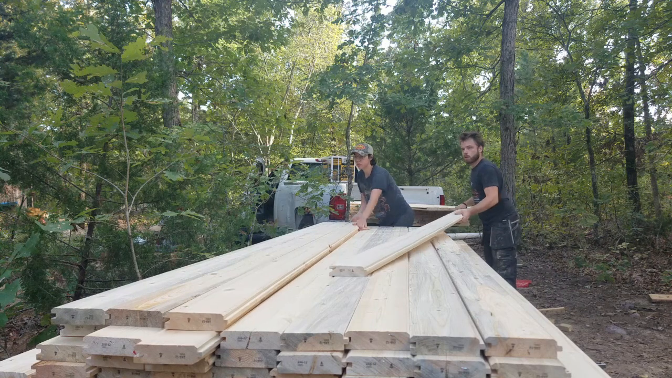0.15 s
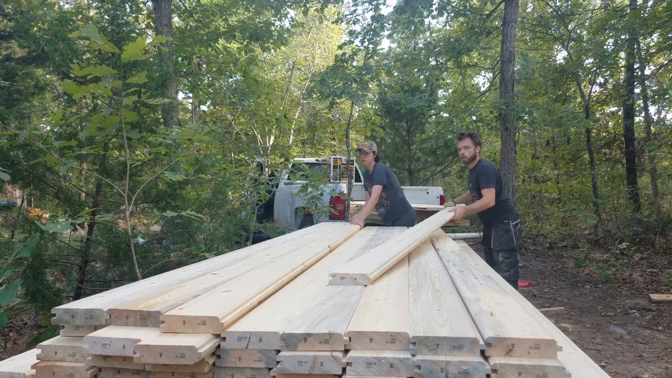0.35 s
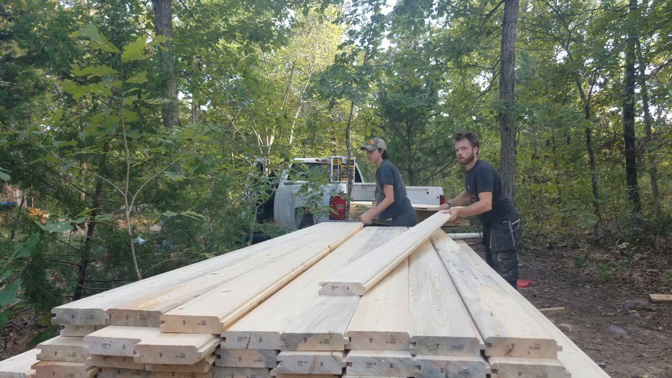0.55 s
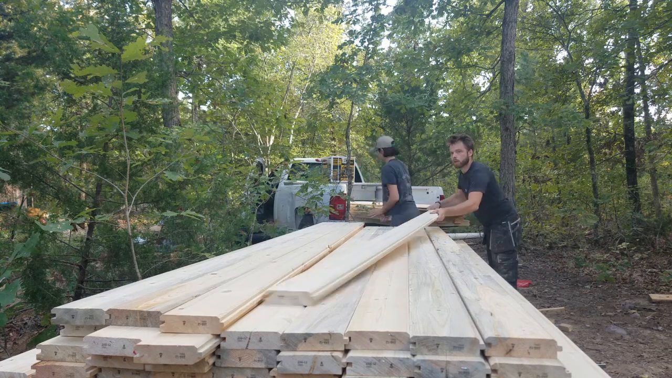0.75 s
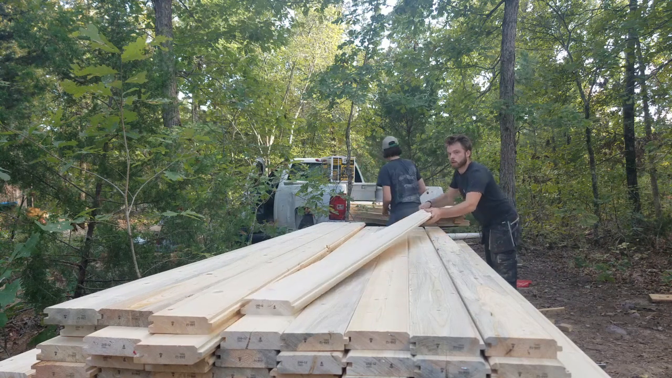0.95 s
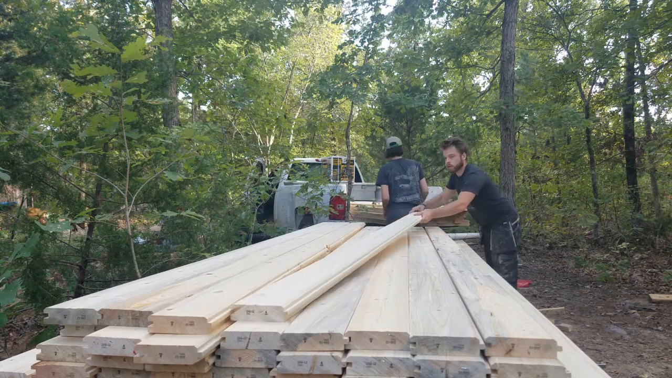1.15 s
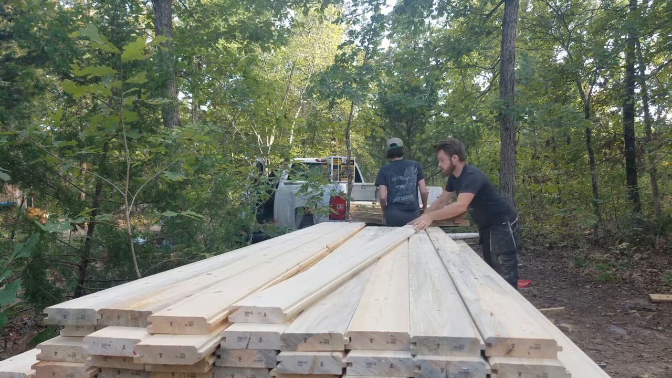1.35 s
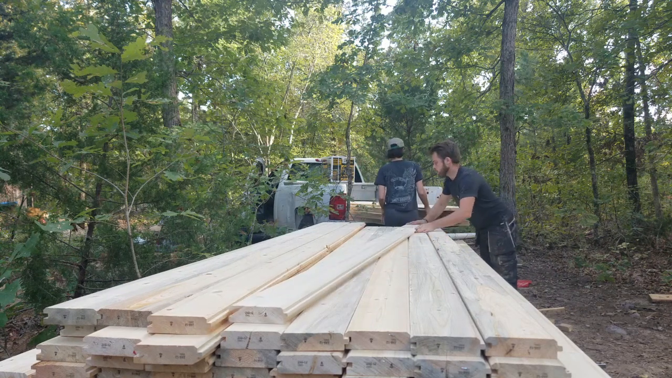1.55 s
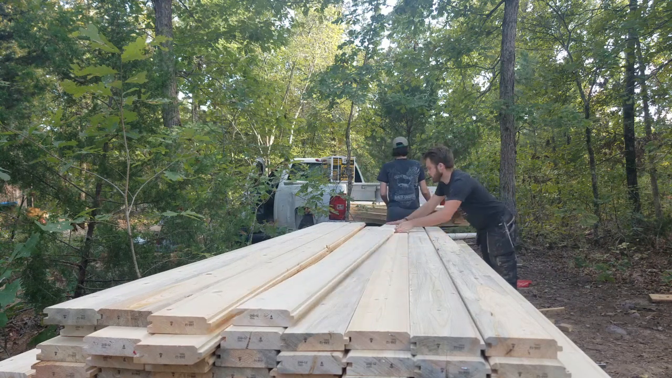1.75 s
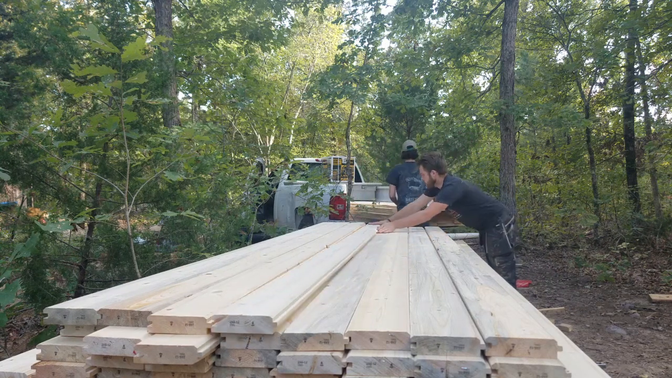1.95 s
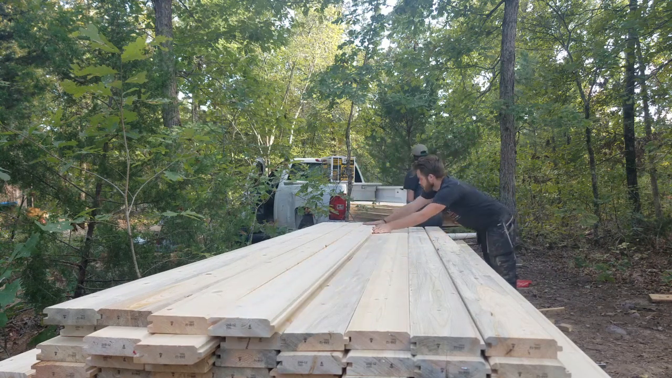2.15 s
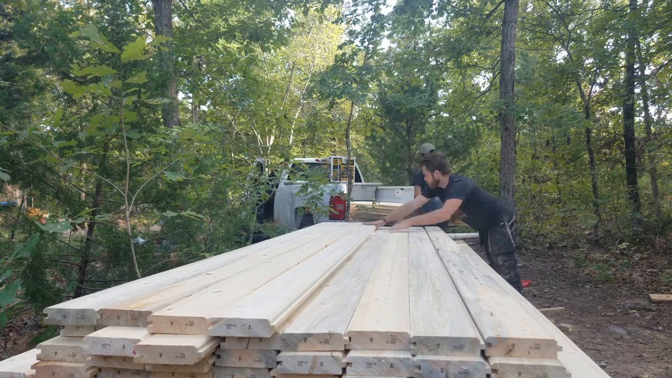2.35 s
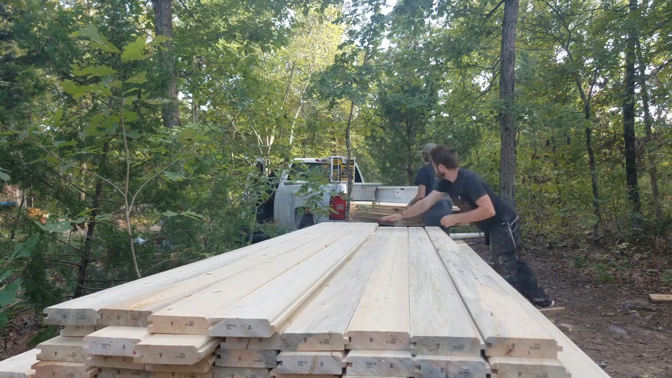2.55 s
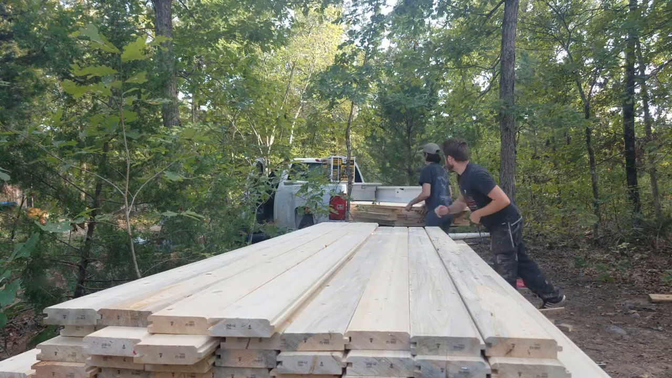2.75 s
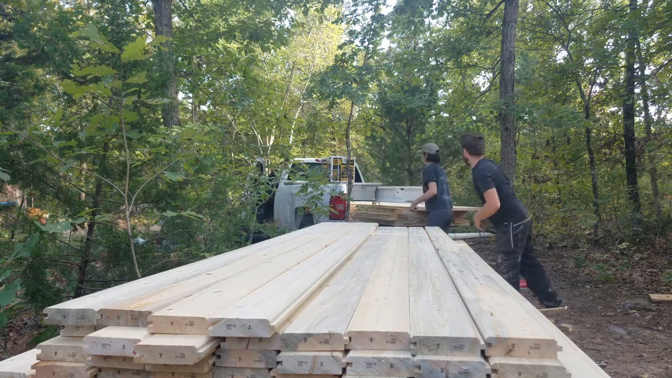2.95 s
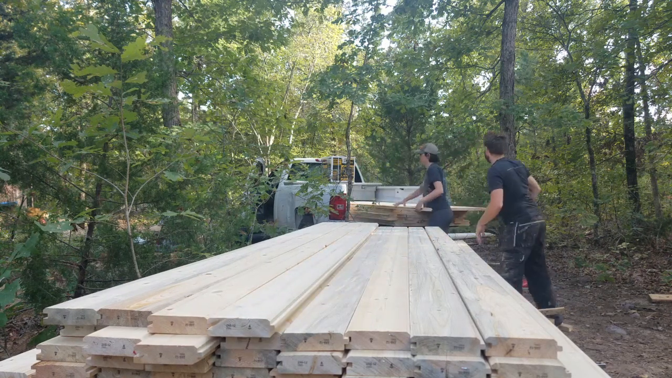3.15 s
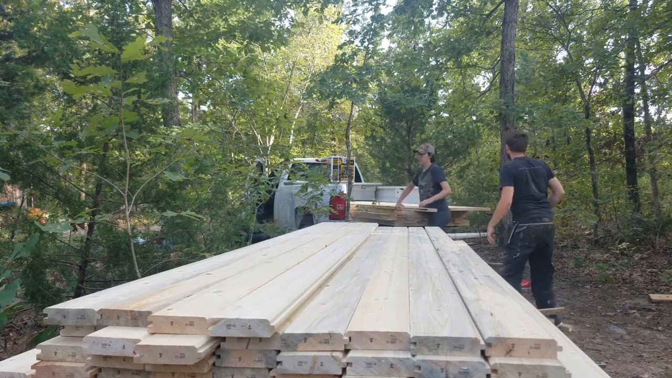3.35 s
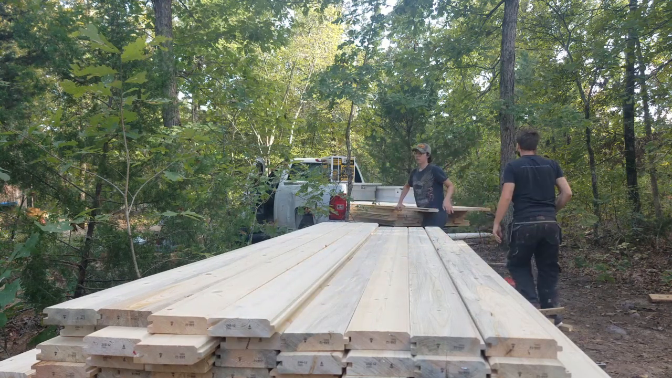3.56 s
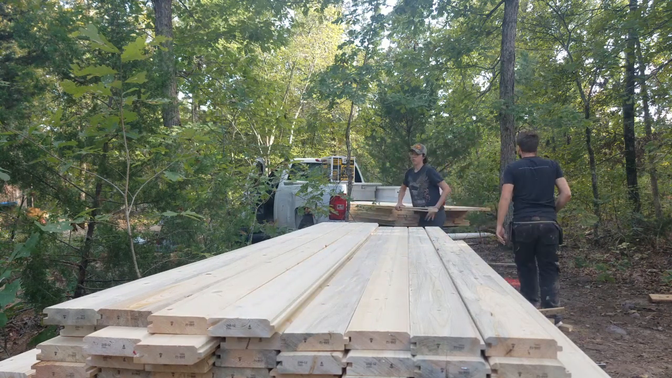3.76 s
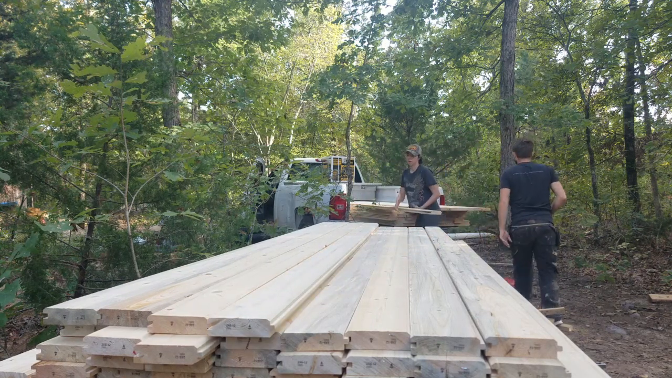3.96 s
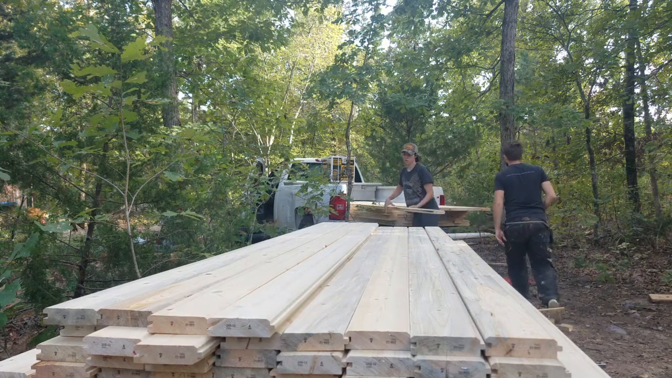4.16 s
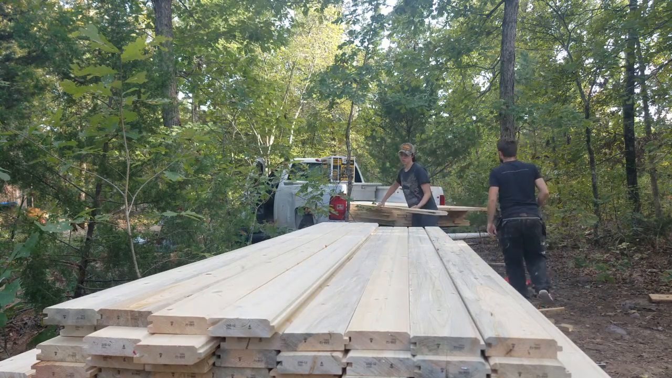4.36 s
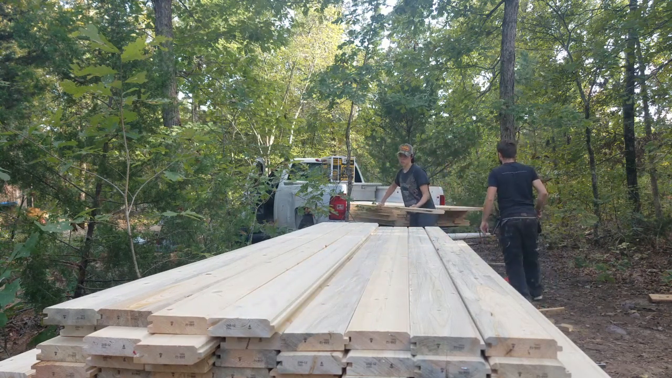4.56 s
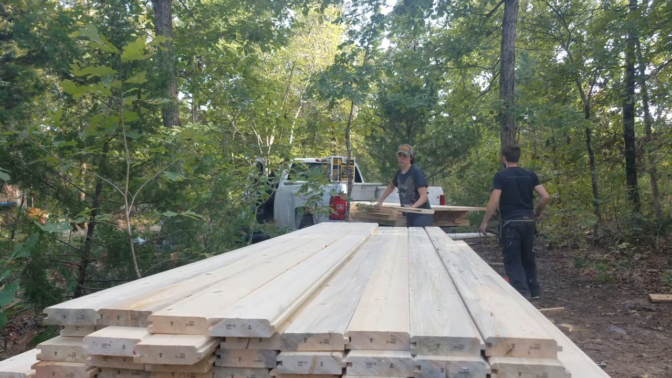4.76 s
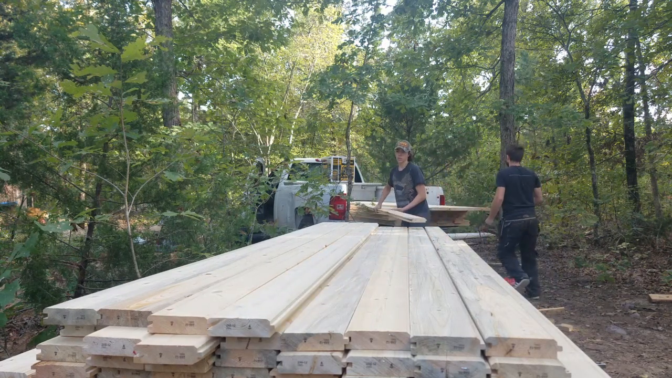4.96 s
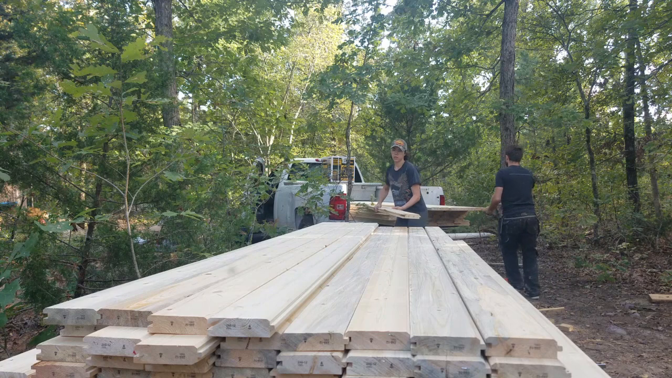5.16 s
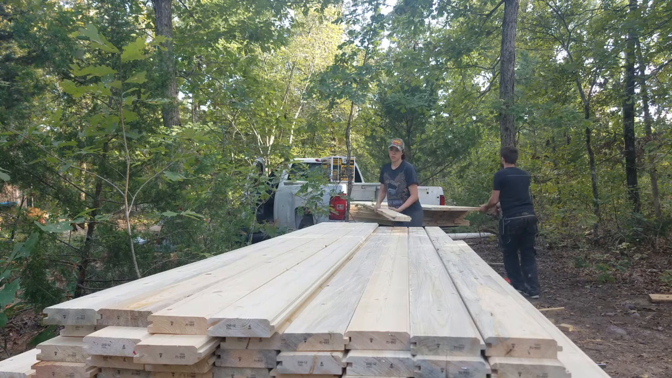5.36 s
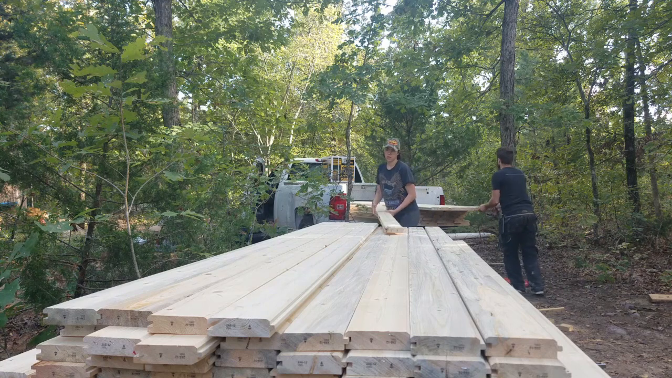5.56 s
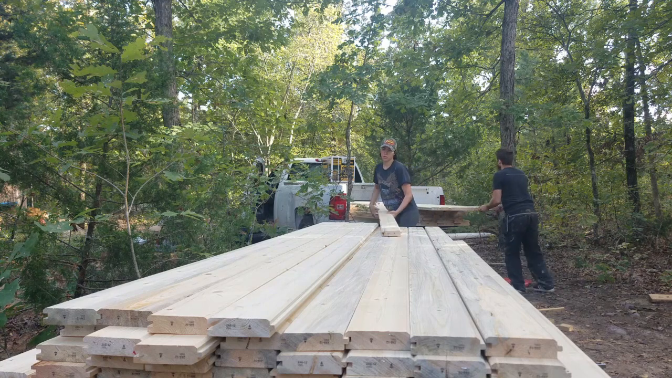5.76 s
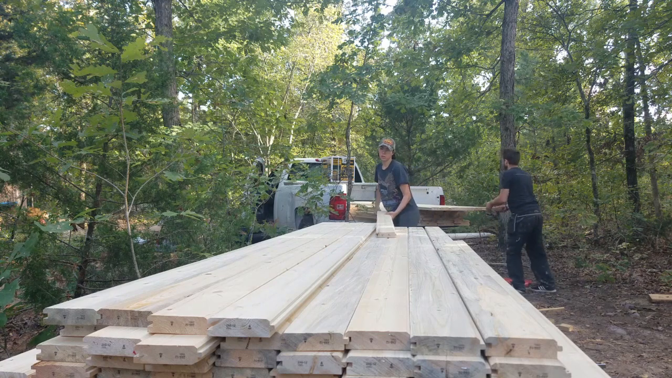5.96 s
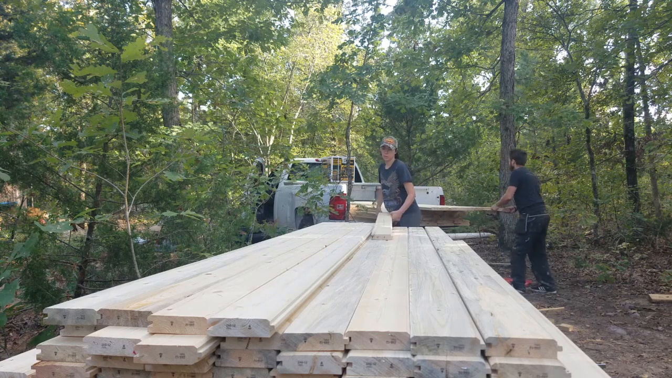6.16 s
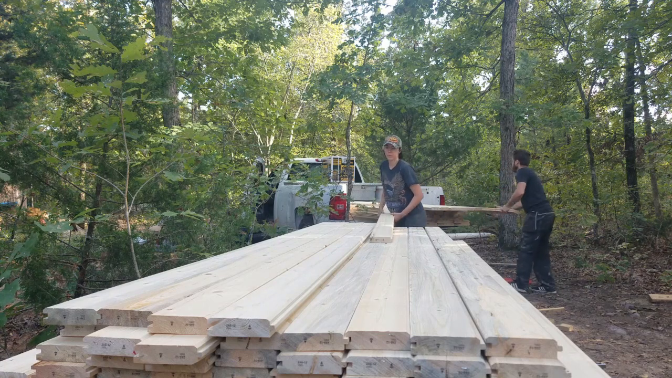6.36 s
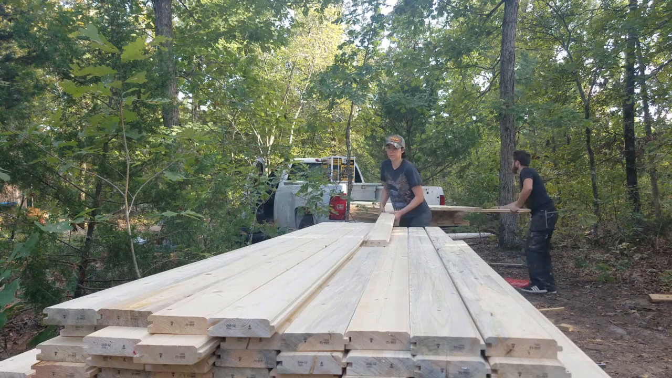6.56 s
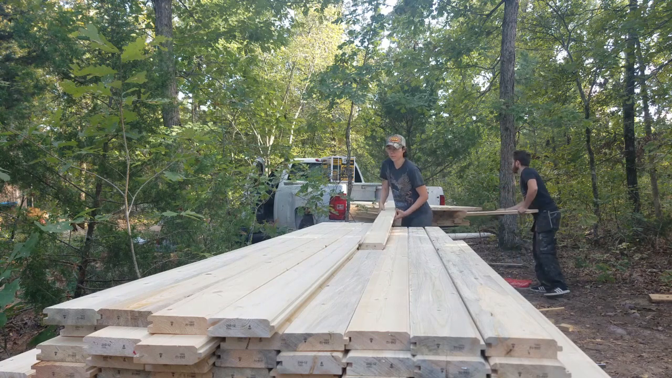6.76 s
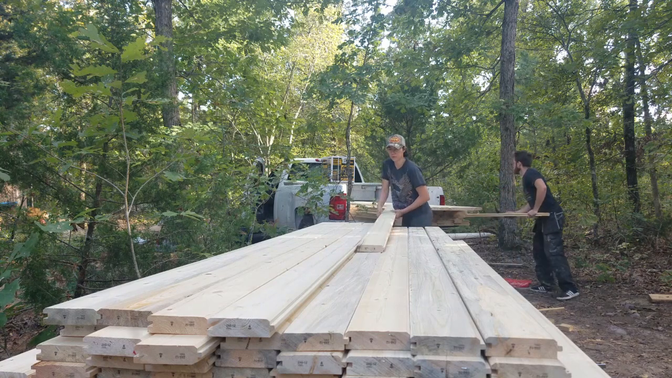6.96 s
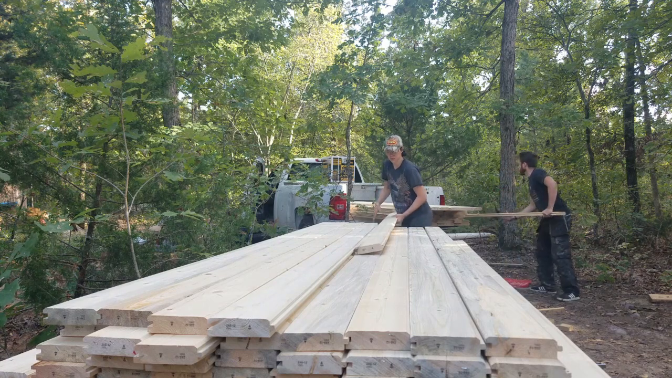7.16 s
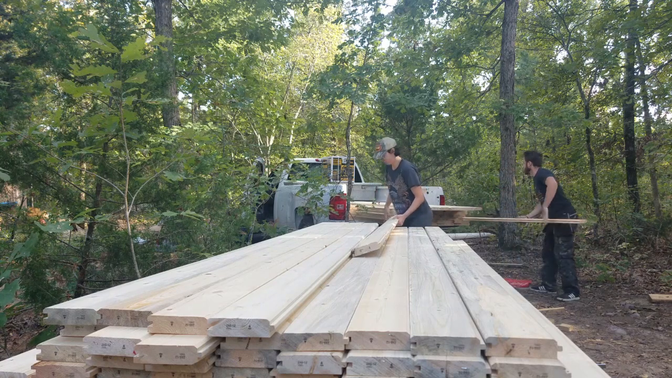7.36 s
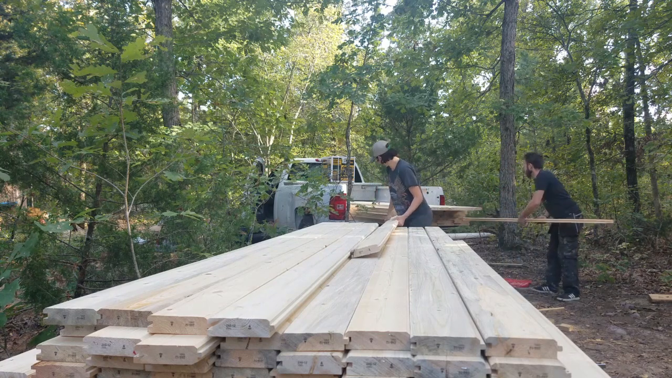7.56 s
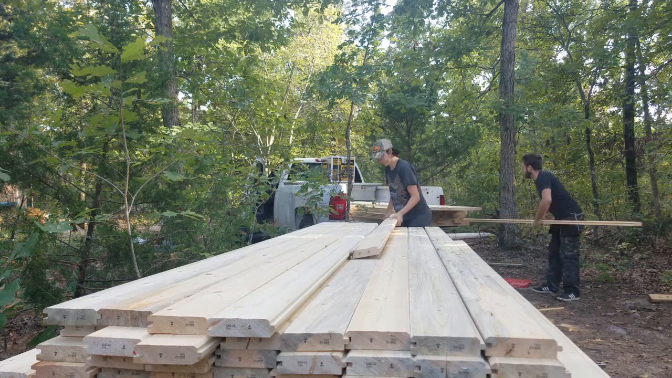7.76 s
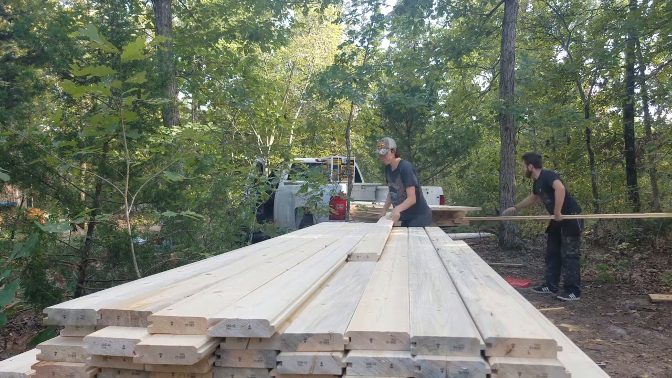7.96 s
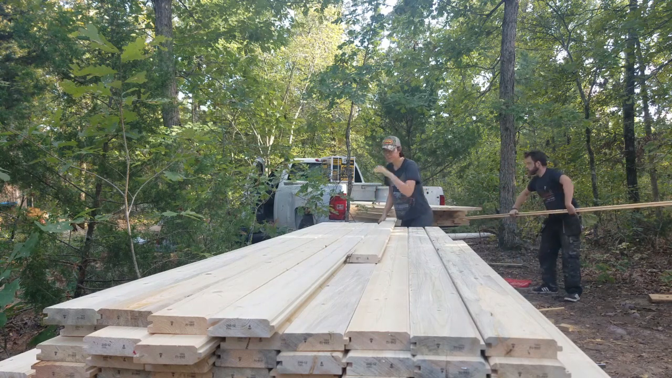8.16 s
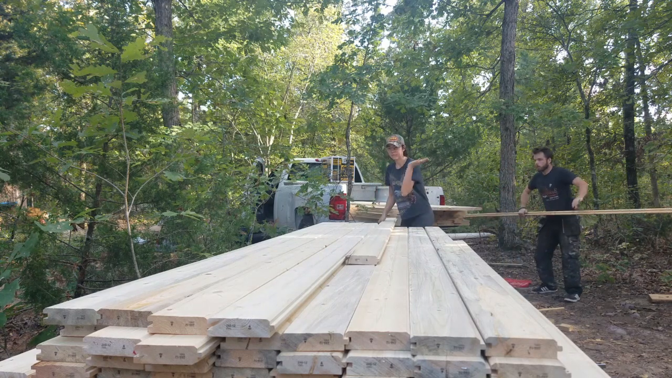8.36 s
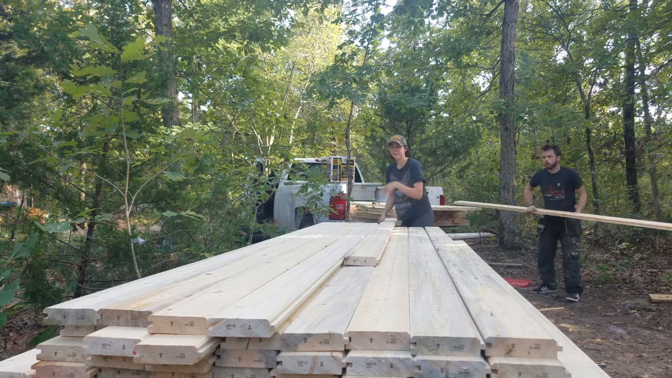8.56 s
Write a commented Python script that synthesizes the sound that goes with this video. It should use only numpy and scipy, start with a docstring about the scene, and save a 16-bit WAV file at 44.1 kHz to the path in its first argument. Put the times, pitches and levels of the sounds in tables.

```python
"""A forest clearing: softwood boards knock and slide, then one drops hard onto the stack just after 1 s.
A nearby cricket chirps from then on; a board is pushed on, and boots crackle through leaves at 2 to 5 s.
From 5.5 s boards slide, groan and knock, land in a flurry near 6.5 s and are nudged into line.
Struck wood sounds as decaying modes, rubbing as random slips, and the trees return a noise-like tail.
Air, microphone hiss and a faint, narrow band of distant insects lie under it all."""
import sys
import numpy as np
from scipy import signal
from scipy.fft import next_fast_len
from scipy.io import wavfile

SR = 44100
rng = np.random.default_rng(int(sys.argv[2]) if len(sys.argv) > 2 else 0)


def master_out(mix):
    """Clip the mix to full scale and print it as 16-bit PCM to the path in sys.argv[1]."""
    frames = np.transpose(np.atleast_2d(mix))
    ceiling = np.clip(frames, -1, 1)
    pcm = np.round(ceiling * 32767).astype(np.int16)
    wavfile.write(sys.argv[1], SR, pcm)


N = 383669  # length in samples
EDGE_HZ = 15900  # upper band limit


def gain_of(db):
    """Turns decibels into an amplitude factor."""
    return 10 ** (np.asarray(db) / 20)


def evened(x):
    """Scales a sound to rms 1."""
    return x / np.sqrt(np.mean(x ** 2) + 1e-20)


def read(points, hz):
    """Reads a table of (Hz, value) on a log-frequency axis."""
    f, value = np.transpose(points)
    return np.interp(np.log(hz + 1), np.log(f + 1), value)


def add(mix, s, sound):
    """Mixes a sound in from time s, in seconds."""
    part = mix[max(round(s * SR), 0):][:len(sound)]
    part += sound[:len(part)]


def coloured(x, points):
    """Gives x a spectrum with a minimum-phase filter: it is causal, so attacks stay sharp."""
    size = next_fast_len(len(x) + 4096)
    hz = abs(np.fft.fftfreq(size, 1 / SR))
    log_gain = np.log(gain_of(read(points, hz)))
    response = np.exp(signal.hilbert(log_gain).conj())
    return np.fft.ifft(np.fft.fft(x, size) * response).real[:len(x)]


def band(x, lo_hz, hi_hz):
    """Passes only the band between two frequencies."""
    sos = signal.butter(3, [lo_hz, min(hi_hz, EDGE_HZ)], "band", fs=SR, output="sos")
    return signal.sosfilt(sos, x)


def resonate(x, hz, width_hz):
    """Shifts hz down to zero, smooths, and shifts back: a resonance of gain 1 that may move."""
    turn = np.exp(2j * np.pi * np.cumsum(hz * np.ones(len(x))) / SR)
    r = np.exp(-np.pi * width_hz / SR)
    return 2 * (turn * signal.lfilter([1 - r], [1, -r], x / turn)).real


def grains(size, per_s, spread_db):
    """Random tiny snaps of either sign, a few of them large."""
    strength = gain_of(spread_db * np.minimum(rng.exponential(1, size), 4))
    sign = rng.choice([-1, 1], size)
    return strength * sign * (rng.random(size) < per_s / SR)


def background(air_db=-60.5, insects_db=-73, insects_hz=7130, width_hz=750):
    """Still air with microphone hiss, and distant insects as noise through a narrow double resonance."""
    # Colour of the air and hiss. Each row: frequency in Hz, relative level in dB.
    air_colour = [(25, -21.5), (45, -9.5), (64, 7.5), (90, -7), (140, -4), (250, -4), (480, 2.5), (900, -5),
                  (2000, -12), (5000, -19), (10000, -29), (13000, -17), (15500, -15)]
    air = evened(coloured(rng.standard_normal(N), air_colour))
    sizzle = resonate(rng.standard_normal(N), insects_hz, width_hz)
    insects = evened(resonate(sizzle, insects_hz, width_hz))
    return gain_of(air_db) * air + gain_of(insects_db) * insects


def forest(x, reach, build_s=0.011):
    """Trunks and leaves return a thin tail that builds up and dies band by band; reach scales its length."""
    # Colour of the scatter. Each row: frequency in Hz, relative level in dB.
    scatter_colour = [(100, -11), (400, -10), (800, -5.5), (1400, -5), (2500, -1.5), (4000, 3), (8000, 2),
                      (15000, -6)]
    # Decay of the scatter. Each row: frequency in Hz, time to fall 60 dB in seconds at reach 1.
    scatter_t60 = [(100, 0.27), (400, 0.38), (1200, 0.81), (3000, 0.55), (6000, .48), (14000, 0.59)]
    hz, t, z = signal.stft(rng.standard_normal(SR), SR, nperseg=256)
    t60 = reach * read(scatter_t60, hz)[:, None]
    z *= gain_of(read(scatter_colour, hz)[:, None] - 60 * t / t60)
    tail = signal.istft(z, SR, nperseg=256)[1]
    tail *= 1 - np.exp(-(np.arange(len(tail)) / SR / build_s) ** 2)
    return signal.fftconvolve(x, tail / np.linalg.norm(tail))[:N]


def cricket(start_hz=4490, sag_hz=300, uneven_db=1.8, scrape=.15):
    """Each wing stroke is a near-pure tone that sags as the wing slows; no two are quite alike."""
    # Chirps. Each row: middle of the first stroke in seconds, number of wing strokes.
    chirps = [(1.166, 4), (1.98, 4), (3.048, 4), (3.545, 3), (4.071, 4), (4.612, 4), (5.369, 4), (6.055, 4),
              (7.64, 4)]
    # Strokes of a chirp. Each row: delay in seconds, length in seconds, average level in dB.
    strokes = [(0, .017, -64.5), (0.035, 0.031, -52.5), (0.083, .032, -51), (.138, .032, -51.5)]
    out = np.zeros(N)
    for s, count in chirps:
        for delay, length, db in strokes[:int(count)]:
            u = np.linspace(0, 1, int(length * SR))
            hz = start_hz * rng.normal(1, .004) - sag_hz * u ** 2
            rasp = evened(resonate(rng.standard_normal(len(u)), hz, 250))
            tone = np.sin(2 * np.pi * np.cumsum(hz) / SR) + scrape * rasp
            swell = gain_of(db + rng.normal(0, uneven_db)) * np.sin(np.pi * u) ** 2
            add(out, s + delay - length / 2, swell * tone)
    return out


def scuff(length, db, hz, per_s=5000, spread_db=4, width=1.48):
    """Random snaps in a band around hz (divided and multiplied by width) swell and fade."""
    size = int(length * SR)
    crackle = band(grains(size, per_s, spread_db), hz / width, hz * width)
    return gain_of(db) * evened(crackle) * np.hanning(size)


def step(length, db, hz):
    """A boot presses through leaves and twigs: a sparse, uneven crackle."""
    return scuff(length, db, hz, per_s=1200, spread_db=1.5, width=2.23)


def splinter(length, db):
    """Splinters catch and snap along a sawn edge: a short, very bright crackle."""
    return scuff(length, db, hz=10200, width=1.7)


def graze(length, db):
    """An edge landing at a slant grazes the face below: a short, dry rasp."""
    return scuff(length, db, hz=1390, per_s=4000, spread_db=5.0, width=1.86)


def ringing(t, place, ring, boom_db, boom_hz=220):
    """The board's modes, each as strong as it moves at the struck place; the lowest are shared with the stack."""
    # Bending modes of a board on the stack. Each row: frequency in Hz, relative level in dB,
    # time to fall 60 dB in seconds at ring 1.
    modes = [(98, -23, 0.2), (135.6, -12.5, 0.21), (161, -11.5, 0.16), (173.7, -16.5, .35),
             (249.1, -11.5, .25), (284.5, -10, .25), (323, -4, 0.23), (344.8, -2.5, 0.16), (345, -7.5, .2),
             (397, 4.5, .19), (428, 0.5, 0.21), (470.4, 4, 0.27), (523.6, -3, 0.4), (575.5, 3, 0.26),
             (630.8, -4, 0.36), (684, 3, 0.17), (713, -2, 0.15), (714, -6, 0.11), (780, 0, 0.09),
             (862, 0.5, 0.096), (929.5, -6, 0.19), (992, -0.5, 0.1), (1023, -1, 0.12), (1135.5, -2.5, 0.13),
             (1270, -5.5, 0.07), (1323, 0, 0.061), (1428, -6, 0.071), (1493, -11, 0.18), (2040, -6.5, 0.25),
             (2620, -14, .1)]
    hz, db, t60 = np.transpose(modes)[:, :, None]
    shape = np.cos(np.pi * place * np.arange(len(modes)))[:, None]
    level_db = db + boom_db * (hz < boom_hz) - 60 * t / (t60 * ring)
    return (shape * gain_of(level_db) * np.sin(2 * np.pi * hz * t)).sum(0)


def pushing(rise_s=.04, stop_s=0.039, waver_db=1.8, waver_s=.055):
    """Strength of rub and hiss: each push gets up to speed, holds and dies away under a wavering hand."""
    # Pushes that slide a board over the stack. Each row: start in seconds, length in seconds,
    # rub of wood on wood in dB, hiss of the sawn fibres in dB, both at full speed and mean pressure.
    pushes = [(0.0, 0.19, -56.5, -63.5), (0.213, 0.16, -57, -61), (0.66, 0.16, -42.5, -56),
              (0.983, 0.053, -53, -61), (1.534, 0.48, -45.5, -52.5), (2.702, 0.45, -68.5, -71.5),
              (4.716, 0.11, -58.5, -74.5), (5.491, 0.14, -46, -57), (5.769, 0.58, -57, -67.5),
              (6.227, 0.61, -49.5, -62.5), (6.446, .1, -30.5, -55), (6.665, 0.25, -37.5, -59.5),
              (7.153, 0.13, -49, -67.5), (7.478, 0.14, -49, -61), (7.675, 0.28, -39, -64),
              (7.98, 0.12, -55, -60)]
    t, rub, hiss = np.arange(N) / SR, np.zeros(N), np.zeros(N)
    for s, length, rub_db, hiss_db in pushes:
        rise = np.clip((t - s) / rise_s, 0, 1)
        speed = rise * np.exp(-np.maximum(t - s - length, 0) / stop_s)
        rub += gain_of(rub_db) * speed
        hiss += gain_of(hiss_db) * speed
    waver = signal.oaconvolve(rng.standard_normal(N), np.hanning(int(waver_s * SR)), "same")
    pressure = gain_of(waver_db * evened(waver))
    return rub * pressure, hiss * pressure


def sliding(catches_per_s=900, spread_db=3, soft_hz=560, fibres_per_s=7000, fibre_spread_db=3):
    """Rough faces catch and let go: the slips ring the board while the fibres hiss."""
    # Colour of the fibre hiss. Each row: frequency in Hz, relative level in dB.
    fibre_colour = [(200, -21), (600, -3.5), (1100, 2), (2200, -5), (4000, -11.5), (7000, -19),
                    (10000, -22.5), (15000, -23)]
    rub_gain, hiss_gain = pushing()
    body = ringing(np.arange(SR // 3) / SR, place=0.96, ring=.6, boom_db=-8.0)
    rub = signal.oaconvolve(grains(N, catches_per_s, spread_db), body)[:N]
    rub = signal.lfilter(*signal.butter(2, soft_hz, fs=SR), rub)
    hiss = coloured(grains(N, fibres_per_s, fibre_spread_db), fibre_colour)
    return rub_gain * evened(rub) + hiss_gain * evened(hiss)


def groan(length, db, first_hz, width_hz=110, rise_hz_per_s=350):
    """Stick-slip locks loosely onto one resonance, which rises as the overhang shortens."""
    size = int(length * SR)
    hz = first_hz + rise_hz_per_s * np.arange(size) / SR
    tone = resonate(resonate(rng.standard_normal(size), hz, width_hz), hz, width_hz)
    return gain_of(db) * evened(tone * signal.windows.tukey(size, .5))


def shudder(db, t60, top_hz=290, boom_db=13):
    """A dropped board shudders on the stack: dying chatter along its length feeds its lowest modes."""
    t = np.arange(SR) / SR
    body = ringing(t[:SR // 3], place=0.02, ring=1.0, boom_db=boom_db)
    # the second half of the chatter is taken, where it is already under way
    chatter = signal.oaconvolve(grains(2 * SR, per_s=600, spread_db=0.5), body)[SR:2 * SR]
    chatter = signal.lfilter(*signal.butter(3, top_hz, fs=SR), chatter)
    fade = np.exp(-np.log(1000) * t / t60) * (1 - np.exp(-t / 0.01))
    return gain_of(db) * evened(chatter) * fade


def slap(db):
    """Flat faces slapping together press out one sharp pulse of air."""
    # Colour of that crack. Each row: frequency in Hz, relative level in dB.
    crack_colour = [(200, -21), (600, -1), (1100, 1.5), (2200, 3.5), (3000, 0), (4300, -9.5), (6000, -18),
                    (9000, -30), (15000, -32)]
    crack = coloured(signal.unit_impulse(SR // 10), crack_colour)
    return gain_of(db) * crack / np.std(crack[:SR // 50])


def blow(db, hard_hz, ring, boom_db, place, span_hz, rise_cycles, clack_db=-4, clack_s=0.02,
         tick_db=-9, span_db=-2, span_t60=0.2, splinter_db=-38, slow_hz=650):
    """A tick and a short clack join the ringing modes; a soft contact takes away the treble."""
    # Dense, quickly damped modes round the point of contact. Each row: frequency in Hz, relative level in dB.
    contact_colour = [(50, -35), (150, -22), (260, -6), (400, 1), (900, -1), (1400, -1.5), (1700, -6),
                      (2700, -10.5), (3800, -19), (7000, -22), (15000, -25.5)]
    t = np.arange(SR // 2) / SR

    def unit(x):
        """Scales to rms 1 over the first 20 ms."""
        return x / np.sqrt(np.mean(x[:SR // 50] ** 2))

    burst = rng.standard_normal(len(t)) * np.exp(-t / (clack_s * 2 * ring))
    clack = unit(coloured(burst, contact_colour))
    tick = unit(coloured(signal.unit_impulse(len(t)), contact_colour))
    # the length of board between its supports adds one note, strongest under a slow, soft contact
    span = np.sin(2 * np.pi * span_hz * t) * np.exp(-np.log(1000) * t / (span_t60 * ring))
    span = unit(span) * min(1, slow_hz / hard_hz)
    wood = unit(ringing(t, place, ring, boom_db)) + gain_of(clack_db) * clack
    wood += gain_of(tick_db) * tick + gain_of(span_db) * span
    # the softer the contact, the longer the force takes to build
    wood = wood * (1 - np.exp(-t * hard_hz / rise_cycles))
    soft = signal.lfilter(*signal.butter(2, min(hard_hz, EDGE_HZ), fs=SR), wood)
    return gain_of(db) * unit(soft + gain_of(splinter_db) * wood)


def struck(db, hard_hz, ring, span_hz):
    """A blow whose boom follows how freely the board rings, its place the free span, and its rise the weight."""
    # a board that rings freely also shakes the stack: 6.5 dB more boom for each doubling of the ring
    boom_db = 2 + 6.5 * np.log2(ring)
    # a heavy blow (-12 dB) lands at once, a lighter one rolls onto its face: 14 dB less doubles the rise
    rise_cycles = .6 * 2 ** ((-12 - db) / 14)
    # a blow nearer the end leaves a shorter, higher span: 370 Hz at a place of 0.2 (0-1 along the board)
    place = .2 * np.sqrt(370 / span_hz)
    return blow(db, hard_hz, ring, boom_db, place, span_hz, rise_cycles)


def scene(wood_wet_db=-14, cricket_wet_db=-12, slap_wet_db=-8, slap_direct_db=-14, radiate_hz=120):
    """Boards, feet and cricket among the trees, each heard directly and through the forest's scatter."""
    # Boots in dry leaves. Each row: start in seconds, length in seconds, level in dB, centre in Hz.
    steps = [(2.17, 0.15, -60.5, 2500), (3.62, 0.37, -56, 826), (4.58, 0.4, -62.5, 2840),
             (5.14, 0.25, -65, 3800)]
    # Snapping splinters. Each row: start in seconds, length in seconds, level in dB.
    splinters = [(0.738, 0.0065, -40.5), (5.476, 0.0047, -46.5), (5.505, 0.013, -55.5), (6.465, 0.018, -44),
                 (6.72, 0.071, -57.5), (7.0, 0.06, -52.5), (8.045, 0.059, -59.5)]
    # Grazing edges. Each row: start in seconds, length in seconds, level in dB.
    grazes = [(0.441, 0.022, -47), (5.503, 0.046, -49.5), (6.25, 0.14, -61), (6.385, 0.035, -47.5),
              (7.718, .04, -47.5), (8.56, 0.064, -54.5)]
    # Groans of a dragged board. Each row: start in seconds, length in seconds, level in dB, starting Hz.
    groans = [(0.23, 0.17, -55.5, 456), (1.565, 0.099, -42, 449), (1.755, .044, -41, 435),
              (1.82, 0.17, -44.5, 400), (4.755, 0.11, -57, 572), (5.785, 0.058, -52.5, 550),
              (6.28, 0.12, -45, 576), (6.39, 0.072, -32.5, 590)]
    # Shuddering boards. Each row: start in seconds, level in dB before the fade, time to fall 60 dB in seconds.
    shudders = [(0.07, -51.5, 1.1), (1.29, -45, .7), (6.466, -24.5, 1.28), (7.66, -42, 1.4)]
    # Slapping faces. Each row: start in seconds, level in dB before the direct and scattered gains.
    slap_times = [(0.443, -56), (0.744, -40), (1.286, -22.5), (1.989, -49), (2.208, -51), (5.507, -47.5),
                  (6.466, -26.5), (7.734, -50)]
    # Blows. Each row: start in seconds, level in dB, contact hardness in Hz,
    # ring as a factor on decay times, resonance of the free span in Hz.
    blows = [(0.068, -27.5, 1060, 0.33, 389), (0.083, -33.5, 600, 0.82, 710),
             (0.443, -47, 3470, 1.35, 1043), (0.621, -46, 382, 0.56, 353), (0.735, -29, 590, 0.51, 410),
             (0.7425, -21.5, 2050, .22, 776), (0.750, -17, 440, 0.82, 468), (1.2625, -12, 1620, 0.57, 794),
             (1.266, -16, 665, 0.85, 409), (1.285, -11, 2940, 0.25, 710), (1.295, -14, 1100, 0.45, 408),
             (1.986, -23.5, 850, 0.38, 409), (2.249, -45, 900, 1.12, 741), (3.008, -55.5, 500, 0.38, 452.4),
             (3.088, -56, 400, .4, 300), (5.548, -37, 700, .9, 483), (5.599, -33.5, 500, 0.25, 436),
             (5.969, -51.5, 1300, 0.13, 920), (6.286, -43, 920, 0.43, 598), (6.398, -29, 905, 0.8, 568),
             (6.408, -32, 900, .5, 620), (6.4635, -17.5, 1400, 0.29, 460), (6.478, -18, 1100, 0.76, 592),
             (6.481, -34, 1700, 0.49, 1060), (6.522, -26, 543, 0.94, 277.6), (6.661, -28, 805, 0.72, 593),
             (6.693, -16.5, 1040, 0.55, 677), (6.709, -20, 1190, 0.31, 385), (6.736, -23, 1270, 0.64, 640),
             (6.785, -27, 1190, 0.24, 488), (6.8545, -23.5, 1050, 0.43, 495), (6.939, -34, 890, 0.95, 496),
             (7.202, -39.5, 900, 0.75, 650), (7.329, -26, 386, 0.41, 415), (7.480, -29, 426, 0.66, 412),
             (7.661, -37.5, 770, 1.1, 357), (7.718, -35, 1800, 0.8, 480), (7.884, -26, 1500, 0.51, 408),
             (8.035, -29, 438, 0.5, 414), (8.066, -28.5, 420, 0.96, 415), (8.096, -39, 5000, 0.15, 1630),
             (8.118, -26, 620, 0.34, 391), (8.228, -43.5, 390, .35, 362.6), (8.564, -48.5, 3000, 0.59, 633)]

    work, slaps, chirps = sliding(), np.zeros(N), cricket()
    events = [(blows, struck), (groans, groan), (steps, step), (grazes, graze),
              (splinters, splinter), (shudders, shudder)]
    for table, source in events:
        for s, *row in table:
            add(work, s, source(*row))
    for s, db in slap_times:
        add(slaps, s, slap(db))
    # narrow boards radiate little deep bass
    work = signal.lfilter(*signal.butter(4, radiate_hz, "high", fs=SR), work)
    # a slap's crack goes sideways, more into the trees than to the microphone
    echo = forest(gain_of(wood_wet_db) * work + gain_of(slap_wet_db) * slaps, reach=0.95)
    echo += gain_of(cricket_wet_db) * forest(chirps, reach=0.97)
    return (work + gain_of(slap_direct_db) * slaps + chirps + echo + background())[None]


def record(dry):
    """The loudest peaks are rounded off; then the band is limited."""
    rounded = dry / (1 + dry ** 6) ** (1 / 6)
    low_pass = signal.firwin(511, EDGE_HZ, window=("kaiser", 9), fs=SR)
    return signal.oaconvolve(rounded, low_pass[None], "same")


dry = scene()
out = record(dry)
master_out(out)
```